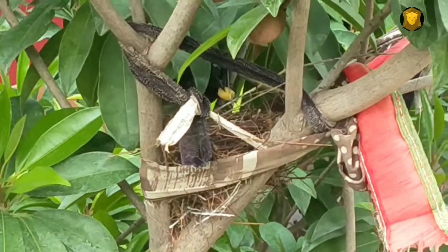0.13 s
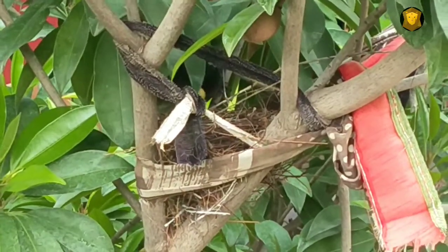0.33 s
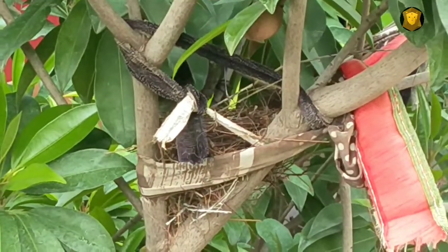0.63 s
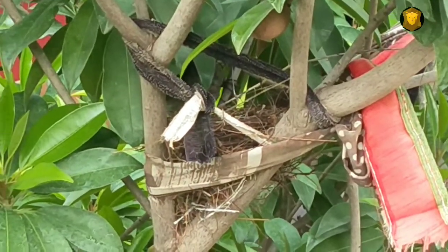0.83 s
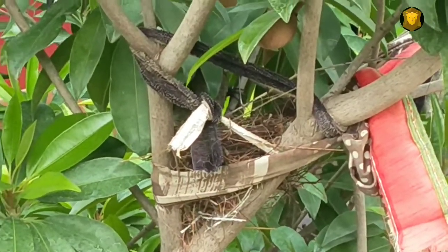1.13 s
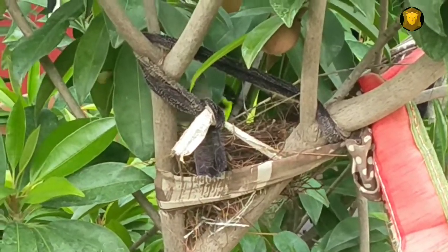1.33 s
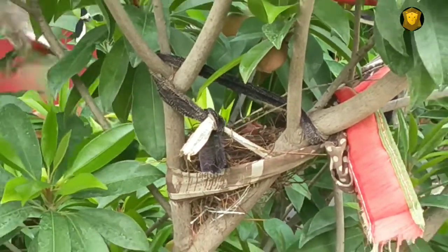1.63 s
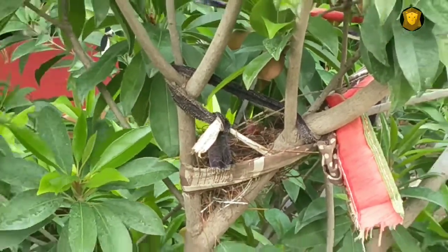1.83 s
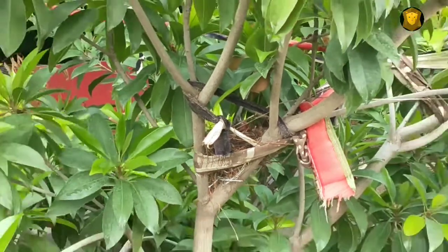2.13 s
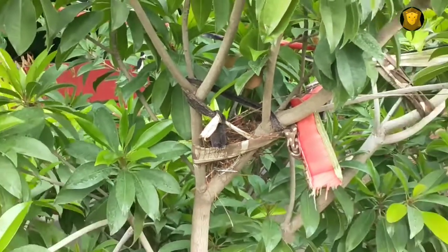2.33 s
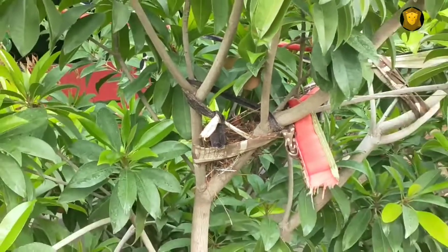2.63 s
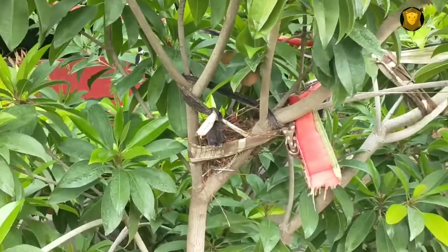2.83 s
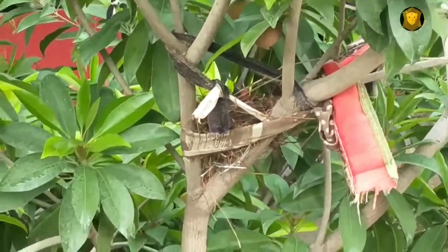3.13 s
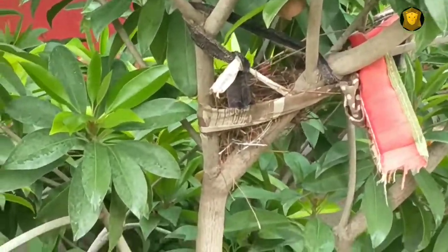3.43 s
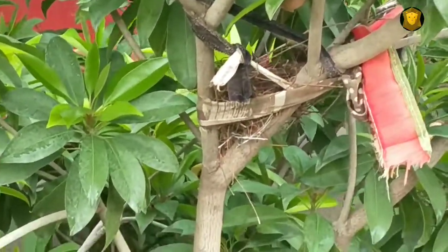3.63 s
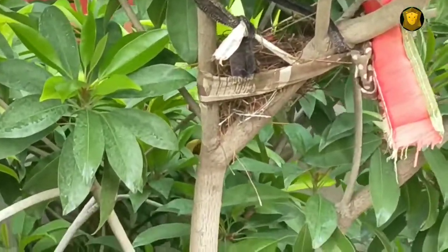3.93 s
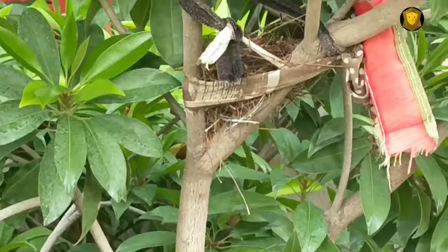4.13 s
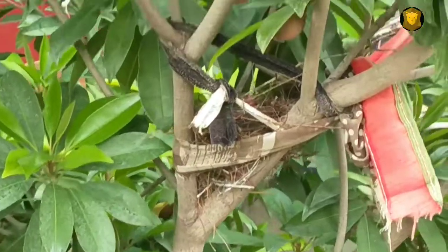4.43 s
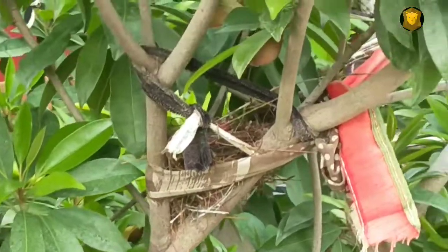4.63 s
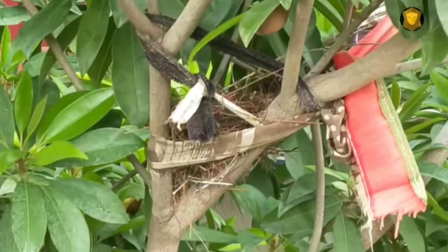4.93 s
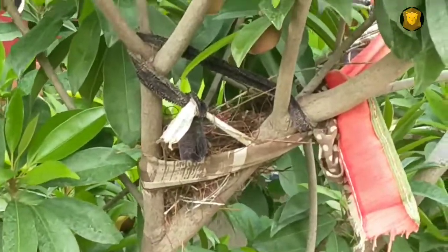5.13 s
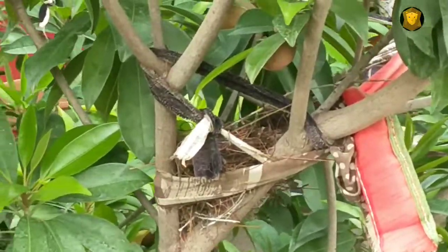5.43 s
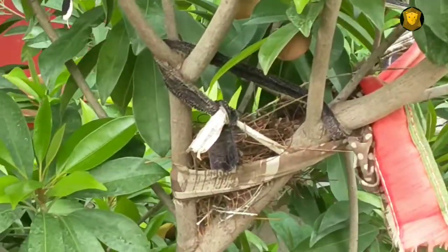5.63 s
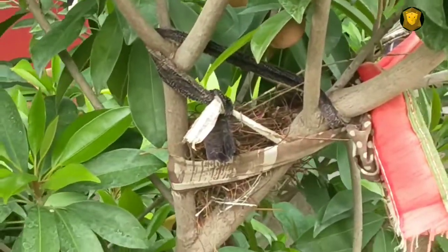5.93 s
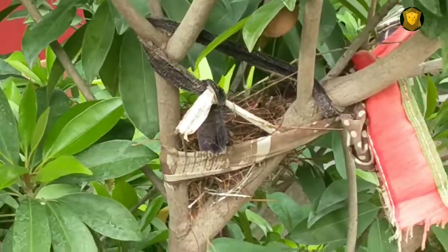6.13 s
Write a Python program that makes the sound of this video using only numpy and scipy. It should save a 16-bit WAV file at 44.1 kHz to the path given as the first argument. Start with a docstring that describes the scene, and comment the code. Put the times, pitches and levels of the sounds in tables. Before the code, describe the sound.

Paired short bird whistles, bright up-flicked chirps, hoarse squawk bursts and two low croaks over rustling leaves and low, uneven wind buffeting.

```python
"""Birds around a garden nest

One bird repeats a level and a falling whistle, another an arch and an up-flick: gliding sines.
A third squawks in bursts of breaking overtones; low croaks are pulses ringing a throat.
Beaks and twigs click as struck resonances, and leaves rustle as patchy noise over faint garden air.
Wind buffets each microphone port on its own. Walls and foliage send back a short echo of noise."""
import sys
import numpy as np
from scipy import signal
from scipy.fft import rfft, irfft, next_fast_len
from scipy.io import wavfile
from scipy.ndimage import uniform_filter1d, map_coordinates

SR = 44100
rng = np.random.default_rng(int(sys.argv[2]) if len(sys.argv) > 2 else 0)


def invert_db(level):
    """Linear amplitude ratio for a level in decibels (20 dB per decade), elementwise."""
    return 10 ** (np.asarray(level, dtype=float) / 20)


def unload_audio(sound):
    """Save the sound as a 16-bit wav file, at the path given as the first command line argument."""
    columns = np.transpose(np.atleast_2d(sound))
    # keep every value between -1 and 1, then stretch to whole-number steps
    steps = np.round(np.clip(columns, -1, 1) * 32767)
    wavfile.write(sys.argv[1], SR, steps.astype(np.int16))


N = 276948
TIME = np.arange(N) / SR


def unit(x):
    """Scales to rms 1 along the last axis."""
    return x / np.sqrt(np.mean(x ** 2, axis=-1, keepdims=True) + 1e-20)


def along(points, hz):
    """Reads (Hz, value) points on a log frequency axis."""
    f, v = np.transpose(points)
    return np.interp(np.log(hz + 1), np.log(f + 1), v)


def curves(rows):
    """Gives one value per sample for each column after the time."""
    s, *cols = np.transpose(rows)
    return [np.interp(TIME, s, c) for c in cols]


def wobble(rate, size=N):
    """A smooth random curve with rate knots a second."""
    knots = rng.standard_normal(int(size * rate / SR) + 4)
    return map_coordinates(knots, [np.arange(size) * rate / SR])


def filtered(x, response):
    """Shapes x by a complex response of frequency."""
    m = next_fast_len(x.shape[-1] + 4096)
    return irfft(rfft(x, m) * response(np.fft.rfftfreq(m, 1 / SR)), m)[..., :x.shape[-1]]


def resonant(modes):
    """Causal response of a few resonances (Hz, width Hz, dB), with alternating signs."""
    def response(f):
        return sum((-1) ** k * invert_db(db) * 1j * f * w / (c * c - f * f + 1j * f * w)
                   for k, (c, w, db) in enumerate(modes))
    return response


def rush(spectrum, patchy_db, size):
    """Unrelated noise per port, rms 1, with patches of random gain about size frames long."""
    z = signal.stft(rng.standard_normal((2, N)), nperseg=512)[2]
    field = uniform_filter1d(rng.standard_normal(z.shape[1:]), size=4, axis=0)
    field = uniform_filter1d(field, size=size, axis=1)
    pair = signal.istft(z * invert_db(patchy_db * field / field.std()), nperseg=512)[1][:, :N]
    return unit(filtered(pair, lambda hz: invert_db(along(spectrum, hz))))


# Echo of walls and foliage. Each row: frequency in Hz, time to fall 60 dB in seconds.
ECHO_DECAY = [(900, 0.32), (2200, 0.45), (5000, 0.48), (9000, 0.011)]


def place(out, s, sound, pan_db, lag, echo_db):
    """Places one row, or one per port, with the left lag samples late and a fresh noise echo."""
    sound = np.atleast_2d(sound)
    hz, t, z = signal.stft(rng.standard_normal((2, SR // 3)), SR, nperseg=256)
    decay = invert_db(-60 * t / along(ECHO_DECAY, hz)[:, None])
    onset = np.minimum(t / 0.0025, 1)
    tail = signal.istft(z * decay * onset, SR, nperseg=256)[1]
    both = invert_db(echo_db) * signal.fftconvolve(sound, tail / np.linalg.norm(tail[0]), axes=1)
    both[0, lag:lag + sound.shape[1]] += invert_db(pan_db / 2) * sound[0]
    both[1, :sound.shape[1]] += invert_db(-pan_db / 2) * sound[-1]
    first = round(s * SR) + SR  # the canvas starts a second early
    out[:, first:first + both.shape[1]] += both


def whistle(out, start, db, hz, pan_db, shape, lag, echo_db, octave_db, lead_scatter,
            drift_db=0, sags=0, drawl=0):
    """One note: an unsteady sine along its shape, with a weak octave; low, slack notes sag and drawl."""
    slack = np.clip((2320 - hz) / 150, 0, 1)
    s, share, shape_db = np.transpose(shape) * [[1 + drawl * slack], [1], [1]]
    t = np.arange(s[0], s[-1], 1 / SR)
    size = len(t)
    pitch_share = np.interp(t, s, share)
    unsteady = np.where(t < 0, lead_scatter, .005)  # the faint lead-in wavers most
    sag = 1 + sags * np.where(t > 0, slack, 0)
    pitch = hz * pitch_share ** sag * (1 + unsteady * wobble(900, size))
    phase = 2 * np.pi * np.cumsum(pitch) / SR
    drift = slack * drift_db * t / s[-1]
    level = invert_db(db + np.interp(t, s, shape_db) + drift + 1.1 * wobble(120, size))
    octave_level = invert_db(octave_db - db) * level ** 2 * (t > 0) * pitch_share ** 12  # fades as the note drops
    octave = octave_level * np.sin(2 * phase) * (1 + .45 * wobble(900, size))
    rough = 1 + .13 * wobble(1500, size)  # a breathy halo
    echo_db = min(echo_db - db, -7.5)
    place(out, start + s[0], level * np.sin(phase) * rough + octave, pan_db, lag, echo_db)


# A level whistle, then a falling one. Each row: start in seconds, gap in seconds,
# first base level in dB, second base level in dB, base pitch in Hz.
WHISTLE_PAIRS = [(-.085, 0.088, -54, -55.5, 2300), (0.218, 0.0859, -49.5, -49.5, 2290),
                 (0.514, 0.085, -47.5, -46, 2330), (0.812, 0.085, -47.5, -49.5, 2333),
                 (1.1115, 0.086, -53.5, -51.5, 2342), (1.4171, 0.082, -52, -51.5, 2310),
                 (1.721, 0.081, -51, -52, 2263), (2.0278, 0.079, -50, -53, 2280),
                 (2.3343, 0.077, -52, -54, 2244), (2.6493, 0.0843, -58, -58.5, 2201),
                 (2.97, 0.074, -60, -59, 2150), (3.294, 0.073, -56.5, -60.5, 2145),
                 (3.6344, 0.076, -57.5, -65, 2114), (3.993, 0.055, -60.5, -67, 2090),
                 (4.342, 0.073, -57, -62.5, 2130), (4.739, 0.0722, -57.5, -60, 2070)]
# The two note shapes. Each row: time from the start in seconds, share of the base pitch, level in dB.
LEVEL_NOTE = [(-.026, .92, -40), (-.016, .98, -16), (-.008, 1.04, -10), (-.003, 1.11, -6),
              (-.001, 1.05, -9), (.003, 1.01, -1), (.02, .995, 0.5), (.042, .96, -4), (.047, .94, -30)]
FALLING_NOTE = [(-.009, 1.14, -40), (-.004, 1.11, -12), (-.001, 1.04, -6), (.003, 1.01, 0.5),
                (.014, .99, -.6), (.03, .9, -5), (.045, .83, -11), (.056, .79, -30)]


def pair_singer(out):
    """A level whistle is followed by a falling one, louder to the left as the bird faces the microphone."""
    echo_db = -63.5  # stays put as the head turns
    for s, gap, level_db, fall_db, hz in WHISTLE_PAIRS:
        pan_db = .5 * (level_db + 57.5)
        whistle(out, s, level_db, hz, pan_db, LEVEL_NOTE, 18, echo_db,
                octave_db=-23.5, lead_scatter=.07, drift_db=-11, sags=1.1)
        # the falling note follows a drop of the level one only in part
        fall_hz = 1.008 * hz + .3 * max(2200 - hz, 0)
        pan_db = .5 * (fall_db + 57.5)
        whistle(out, s + gap, fall_db, fall_hz, pan_db, FALLING_NOTE, 18, echo_db,
                octave_db=-25, lead_scatter=.08, drift_db=6, sags=.1, drawl=.38)


# An arch, then an up-flick. Each row: start in seconds, gap in seconds, arch base level in dB,
# flick base level in dB, left-right balance of the arch in dB.
ARCH_SONGS = [(1.775, 0.12, -70, -52.5, -10), (2.112, 0.13, -61.5, -51, -3), (2.442, 0.13, -67.5, -49, -5),
              (2.778, 0.13, -68, -53.5, -3), (5.255, .13, -70, -53.5, 13), (5.605, 0.13, -72.5, -61, 5),
              (5.951, 0.135, -78, -65, 1)]
# The two note shapes. Each row: time from the start in seconds, share of the base pitch, level in dB.
ARCH_NOTE = [(-.006, .6, -39), (.004, .68, 8), (.02, .94, 6), (0.026, 1.001, 7), (0.036, .94, 9),
             (0.048, .79, 6), (.062, .73, 3.5), (0.068, 0.2, -13.5)]
FLICK_NOTE = [(-.075, .675, -48), (-.03, .69, -34), (-.003, .72, -20), (.006, .78, -7), (.015, .9, -3),
              (.022, .99, -.3), (.027, .995, -1.5), (.034, .95, -9), (.04, .93, -30)]


def arch_singer(out):
    """A note arches up and down, then a higher one flicks up; softer flicks stop lower."""
    loudest = max(row[3] for row in ARCH_SONGS)
    for s, gap, arch_db, flick_db, pan_db in ARCH_SONGS:
        whistle(out, s, arch_db, 3516, pan_db, ARCH_NOTE, 1, echo_db=-72.5,
                octave_db=-70, lead_scatter=.01)
        flick_hz = 5290 + 11.5 * (flick_db - loudest)
        whistle(out, s + gap, flick_db, flick_hz, 8, FLICK_NOTE, 14, echo_db=-62,
                octave_db=-70, lead_scatter=.008)


# Squawks in bursts. Each row: start in seconds, level in dB, left-right balance in dB,
# top of the glide in Hz.
SQUAWK_CALLS = [(1.957, -66, 2, 1037), (2.043, -62.5, 1.5, 1022), (3.644, -62, -1, 1061),
                (3.673, -66.5, -1, 1068), (3.697, -60, 0.5, 1131), (3.762, -57, 2.5, 1011),
                (3.843, -57, 1.5, 1019), (3.95, -55, 0.5, 1135), (4.037, -54, 2.5, 1139),
                (4.129, -55, 0.5, 1144), (5.124, -67.5, -3, 1040), (5.176, -62, -2, 1091),
                (5.247, -59, -3.5, 1014), (5.352, -58.5, -1, 1065)]
# Throat colour. Each row: frequency in Hz, gain in dB.
SQUAWK_THROAT = [(600, -9.5), (850, -5), (1100, -1), (1500, 1.5), (2000, -5), (2500, -1), (3100, -1),
                 (4300, -6), (4900, -1), (5450, 0.5), (5900, -11), (6300, -18.5), (7500, -35.5)]
# Shading of the ports by the microphone's body and branches. Each row: frequency in Hz,
# left-right balance in dB.
SQUAWK_SHADING = [(1000, -2.5), (1900, -6), (2400, 3), (3000, 3.5), (4200, 7.5), (5450, -6.5)]


def squawker(out):
    """Clear overtones glide up, then drop and break: unsteady pitch, half-pitch lines, gated rasp."""
    t = np.arange(0, .043, 1 / SR)
    u = t / t[-1]
    size, margin = len(u), 200  # samples
    effort = np.interp(u, [0, .12, .28, .44, .78, 1], [.02, .45, .95, .94, .55, 0])
    for start, db, pan_db, top_hz in SQUAWK_CALLS:
        hoarse = .12 + .03 * max(-59 - db, 0)  # softer squawks are hoarse from the start
        broken = np.interp(u, [.34, .48], [hoarse, .8])
        from_hz = 980 * (1 - .147 * top_hz / 1140)  # the widest glide starts lowest
        glide = np.interp(u, [0, .44, .54, 1], [from_hz, top_hz, .9 * top_hz, .84 * top_hz])
        phase = 2 * np.pi * np.cumsum(glide * (1 + .143 * broken * wobble(492.5, size))) / SR
        stack = 0
        for k in range(1, 8):
            gate = 1 if k < 4 else 1.37 * broken  # high overtones come with the break
            strength = invert_db(rng.normal(0, 2.7)) * effort ** (.58 * k) * gate
            stack = stack + strength * np.cos(k * phase + k * k)
        stack = stack * (1 - .45 * broken) * (1 + 1.6 * broken * np.cos(phase / 2))
        rasp = 1.05 * broken * effort * rng.standard_normal(size) * (1 + .7 * np.cos(phase / 2))
        pushes = invert_db(3.5 * broken * wobble(170, size))
        source = np.pad(pushes * (stack + rasp), margin)
        voice = unit(filtered(source, lambda hz: invert_db(along(SQUAWK_THROAT, hz))))
        ports = filtered(voice, lambda hz: invert_db(along(SQUAWK_SHADING, hz) * [[.5], [-.5]]))
        place(out, start - margin / SR, invert_db(db) * ports, pan_db, lag=2, echo_db=-9)


# Two croaks, one list each. Each row: time in seconds, pulses a second, level in dB.
CROAK_CALLS = [
    [(0, 87, -66), (.1, 87, -65), (.3, 86, -63), (.36, 78, -63), (.43, 68, -63.5), (.47, 61, -63),
     (.5, 57, -68)],
    [(5.968, 84, -75), (6.04, 80, -73), (6.12, 71, -67.5), (6.18, 62, -66), (6.24, 50, -69),
     (6.28, 48, -73)],
]
# Throat resonances. Each row: frequency in Hz, width in Hz, gain in dB for one pass.
CROAK_THROAT = [(757, 410, 0.5), (1320, 260, 4.5), (1727, 105, 6), (2030, 230, 1.5), (2470, 79, 2.5),
                (3300, 400, -3.5)]


def croaker(out):
    """Slow uneven pulses ring a throat, with a puff of breath noise in each."""
    for rows, puff in zip(CROAK_CALLS, (.03, .05)):
        s, rate, db = np.transpose(rows)
        t = np.arange(s[0], s[-1], 1 / SR)
        cycles = np.cumsum(np.interp(t, s, rate) * (1 + .015 * wobble(60, len(t)))) / SR
        pulses = np.diff(np.floor(cycles), prepend=0) * invert_db(1.5 * rng.standard_normal(len(t)))
        puffs = puff * np.exp(-(cycles % 1) / .2) * rng.standard_normal(len(t))
        # squared response: the throat twice over, with deep valleys
        voice = unit(filtered(pulses + puffs, lambda hz: resonant(CROAK_THROAT)(hz) ** 2))
        place(out, s[0], invert_db(np.interp(t, s, db)) * voice, pan_db=1.5, lag=19, echo_db=-13)


# Beak snaps, then twig cracks. Each row: start in seconds, peak level in dB, left-right balance in dB.
BEAK_SNAPS = [(5.4066, -60, 0.5), (5.4437, -48, -5), (5.476, -56, -6), (5.5091, -41, -8)]
TWIG_CRACKS = [(1.247, -64, -13), (4.3044, -60, -10), (5.5526, -59.5, -3), (5.5977, -50, -3)]
# Their resonances. Each row: frequency in Hz, width in Hz, gain in dB.
BEAK_RING = [(1776, 237, -14.5), (2710, 166, -7)]
TWIG_RING = [(5230, 750, -8), (6500, 820, -30), (13800, 1700, -17.5)]


def clicks(out):
    """A beak snaps in one dry blow; a twig cracks and scrapes more: noise bursts ring resonances."""
    t = np.arange(0, .04, 1 / SR)
    for events, modes, scrape in (BEAK_SNAPS, BEAK_RING, .02), (TWIG_CRACKS, TWIG_RING, .25):
        for s, db, pan_db in events:
            envelope = np.exp(-t / .00023) + scrape * np.exp(-t / .019)
            blow = rng.standard_normal(len(t)) * envelope
            # distance dulls the top
            ring = filtered(blow, lambda hz: resonant(modes)(hz) / (1 + 1j * hz / 6000) ** 2)
            place(out, s, invert_db(db) * ring / abs(ring).max(), pan_db, lag=0, echo_db=-7)


# Faint whistles farther off. Each row: start in seconds, length in seconds, start pitch in Hz,
# end pitch in Hz, level in dB.
FAR_WHISTLES = [(0.168, 0.06, 4900, 5250, -73), (1.135, .045, 5120, 5100, -78),
                (1.328, 0.09, 3960, 4410, -77.5), (1.4, 0.04, 5500, 4990, -74),
                (1.702, 0.024, 5410, 5250, -74.5), (3.441, 0.028, 2830, 2880, -71),
                (4.066, 0.135, 2310, 2325, -58.5), (4.075, 0.05, 5300, 6000, -67),
                (4.23, 0.046, 2440, 2310, -69), (4.384, 0.09, 2340, 2455, -64),
                (4.575, .045, 2530, 2440, -75), (5.685, 0.085, 1900, 1760, -73),
                (5.665, 0.1, 2490, 2190, -69), (5.862, .045, 3240, 3335, -81),
                (6.147, 0.025, 2740, 2820, -69)]
# Left-right balance of the far whistles by pitch, all to the left. Each row: pitch in Hz, balance in dB.
FAR_BALANCE = [(2300, 14), (4000, 17), (5600, 9)]


def far_whistlers(out):
    """Short faint sines glide between two pitches, lingering at the highest."""
    for start, length, from_hz, to_hz, db in FAR_WHISTLES:
        u = np.arange(0, 1, 1 / (length * SR))
        arched = u ** 2 if to_hz < from_hz else 1 - (1 - u) ** 3
        pitch = from_hz + (to_hz - from_hz) * arched + .012 * from_hz * wobble(200, len(u))
        phase = 2 * np.pi * np.cumsum(pitch) / SR
        level = invert_db(db + 2.2 * wobble(90, len(u))) * np.sin(np.pi * u) ** .6
        place(out, start, level * np.sin(phase), along(FAR_BALANCE, from_hz), lag=8, echo_db=-7)


# Slow swell and fall of the rustle in the breeze. Each row: time in seconds, level in dB.
BREEZE_LEVEL = [(0, -94), (1.1, -98.5), (1.35, -92), (1.7, -76), (3.1, -83.5), (3.45, -73.5), (4.3, -73),
                (5.02, -83), (5.5, -77), (6.28, -80.5)]
# Stirs of the leaves. Each row: start in seconds, length in seconds, rustle level in dB,
# fine hiss level in dB.
LEAF_STIRS = [(1.452, 0.061, -69.5, -91), (1.623, 0.036, -75.5, -83), (3.465, 0.45, -86, -92),
              (3.59, 0.037, -69.5, -73.5), (4.074, 0.08, -67.5, -100), (4.293, 0.097, -89, -85.5),
              (4.48, 0.098, -72, -83.5), (4.609, 0.14, -69, -83.5), (5.245, 0.148, -71, -80),
              (5.606, 0.0556, -74, -84), (5.752, 0.043, -70, -99), (5.826, 0.02, -80, -89),
              (6.041, 0.14, -66.5, -76)]
# Colours of the rustle and of the hiss. Each row: frequency in Hz, relative gain in dB.
RUSTLE_COLOUR = [(1880, -29.5), (3200, -12.5), (3800, -12), (5230, 0), (8480, -24), (9500, -28),
                 (12400, -52), (20900, -120)]
HISS_COLOUR = [(5000, -49), (7500, -16), (10500, -10.5), (12800, -8.5), (14300, -4), (15400, -12)]


def leaves():
    """Leaves rub in the breeze and stir now and then: crackly rustle noise and a finer hiss."""
    rustle_gain, hiss_gain = invert_db(curves(BREEZE_LEVEL)[0]), invert_db(-102)
    for s, length, rustle_db, hiss_db in LEAF_STIRS:
        rise, fall = (s - TIME) / .037, (TIME - s - length) / .17  # seconds for 20 dB
        stir = invert_db(-20 * np.maximum(0, np.maximum(rise, fall)))
        rustle_gain = np.hypot(rustle_gain, invert_db(rustle_db) * stir)
        hiss_gain = np.hypot(hiss_gain, invert_db(hiss_db) * stir)
    crackle = unit(invert_db(2.7 * wobble(300) + 1.6 * wobble(30)))
    rustle = rustle_gain * crackle * rush(RUSTLE_COLOUR, patchy_db=3.5, size=14)
    hiss = hiss_gain * crackle * rush(HISS_COLOUR, patchy_db=1, size=8)
    return rustle + hiss


# Eddies on a port. Each row: time in seconds, nominal peak in dB, pitch of the push in Hz,
# port (0 left, 1 right).
EDDIES = [(0.012, -31, 125, 1), (0.066, -24.5, 100, 0), (0.091, -31, 180.4, 0), (0.238, -30, 116, 0),
          (0.477, -29, 148, 0), (0.487, -25.5, 126, 1), (0.566, -29, 160, 0), (0.586, -29.5, 109, 0),
          (0.644, -27.5, 119, 1), (0.862, -30, 113, 0), (1.184, -27, 129, 0), (1.196, -32.5, 92, 0),
          (1.208, -33, 117.4, 0), (1.66, -28, 93, 1), (1.806, -32.5, 117, 1), (2.158, -25.5, 110, 1),
          (2.177, -32.5, 162, 0), (2.51, -31, 128.9, 1), (3.233, -30, 122, 1), (3.347, -31, 145, 1),
          (3.525, -32, 180, 1), (3.745, -27, 140.8, 1), (3.79, -31.5, 132, 1), (3.932, -19, 135, 1),
          (3.939, -39, 134, 1), (3.961, -16.5, 202, 1), (3.97, -17, 135.4, 1), (4.036, -21.5, 121, 1),
          (4.099, -31.5, 135.6, 1), (4.418, -30, 149, 0), (4.452, -29.5, 88.5, 0), (4.827, -30, 150, 0),
          (0.163, -31.5, 122, 0), (0.742, -34, 84, 0), (1.049, -37, 117, 1), (1.07, -35.5, 100, 0),
          (1.26, -35.5, 130, 1), (1.436, -39.5, 111, 1), (1.591, -35, 105, 1), (2.229, -37.5, 117, 0),
          (3.642, -33.5, 123, 1), (3.698, -31, 110, 1), (4.263, -36, 121.7, 0), (4.538, -61, 119, 0),
          (4.787, -32, 98, 0), (4.87, -35, 79, 1), (5.128, -36, 124, 1), (5.141, -33, 120, 0),
          (5.236, -30.5, 141, 0), (5.386, -38, 94, 0), (5.717, -35, 87.3, 0), (5.78, -38.5, 120, 1),
          (5.949, -34, 120, 0), (6.03, -37, 119, 0), (6.188, -36.5, 104, 1), (6.255, -35, 103, 1)]


def eddies():
    """A single eddy gives its port one quick push and rebound, with a small sharp front."""
    out = np.zeros((2, N + 2 * SR))
    t = np.arange(-SR // 50, SR // 20) / SR
    for s, peak_db, hz, port in EDDIES:
        x = (np.pi * hz * t) ** 2
        push = (1 - 2 * x) * np.exp(-x)
        x = (2.2 * np.pi * hz * t) ** 2
        edge = .047 * (1 - 2 * x) * np.exp(-x)
        first = round(s * SR) + SR - SR // 50
        out[round(port), first:][:len(t)] += invert_db(peak_db) * (.83 * push + edge)
    return out[:, SR:SR + N]


# Wind strength. Each row: time in seconds, strength in dB, left-right balance in dB.
WIND_STRENGTH = [(0.0, -47.5, -3.5), (0.1, -47.5, 14.5), (0.61, -51, 0.5), (1.22, -47.5, 4),
                 (1.7, -55.5, -4), (2.26, -49, 10), (2.33, -53.5, -9), (3.01, -59, -3.5),
                 (3.32, -51.5, -18.5), (3.78, -56, -13), (3.86, -51.5, -8), (3.93, -54.5, -17.5),
                 (4.32, -53.5, 16.5), (4.56, -50.5, 6.5), (5.74, -56.5, 5.5), (5.86, -54, -13.5),
                 (5.93, -51, 6), (6.28, -63, -7)]
# Colour of the buffeting. Each row: frequency in Hz, relative gain in dB.
BUFFET_COLOUR = [(12, -29), (20, -17), (61, 2.5), (112, 3), (219, -11.5), (410, -32), (468, -39.5),
                 (700, -30.5), (910, -69.5), (1540, -120)]


def buffeting():
    """Turbulence shakes each port in its own lumps, brighter when stronger and harder around eddies."""
    strength_db, pan_db = curves(WIND_STRENGTH)
    power = invert_db([strength_db + pan_db / 2, strength_db - pan_db / 2]) ** 2
    for s, peak_db, hz, port in EDDIES:
        swell_db = -42 + .55 * (peak_db + 28)
        power[round(port)] += invert_db(swell_db) ** 2 * np.exp(-((TIME - s) / .026) ** 2)
    gust = np.sqrt(power)
    lumps = invert_db(2.6 * np.array([wobble(30), wobble(30)]))
    shake = gust * unit(lumps * rush(BUFFET_COLOUR, patchy_db=1.5, size=8))
    noise = filtered(rng.standard_normal((2, N)), resonant([(260, 260, 1.7)]))
    flutter = 6 * gust ** 1.58 * lumps * noise
    return shake + filtered(flutter, lambda hz: 1 / (1 + (hz / 450) ** 4))


# Distant murmur of air and traffic, then its thin treble. Each row: time in seconds, level in dB.
MURMUR_LEVEL = [(0.0, -62), (0.68, -68), (1.3, -68.5), (2.5, -69.5), (4.7, -70), (5.0, -70), (5.3, -68.5),
                (6.28, -66)]
TREBLE_LEVEL = [(0, -92), (.22, -78.5), (.45, -82.5), (1.1, -83.5), (1.6, -81), (4.7, -85), (5.0, -90),
                (5.3, -84.5)]
# Their colours. Each row: frequency in Hz, relative gain in dB.
MURMUR_COLOUR = [(180, -30), (300, 2.5), (400, -1), (455, -4.5), (560, -7.5), (731, -10.5), (900, -19),
                 (1220, -20), (1700, -20), (2070, -18.5), (2360, -16.5), (2700, -17), (3300, -59)]
TREBLE_COLOUR = [(2200, -29.5), (2800, -4), (3570, -3.5), (4050, -13.5), (4600, -7), (5390, -9.5),
                 (6500, -19.5), (15500, -23.5)]


def garden_air():
    """Distant air and traffic as coloured noise, a thin treble, and a faint far drone of narrow noise."""
    murmur = invert_db(curves(MURMUR_LEVEL)[0]) * rush(MURMUR_COLOUR, patchy_db=4, size=16)
    treble = invert_db(curves(TREBLE_LEVEL)[0]) * rush(TREBLE_COLOUR, patchy_db=7.5, size=24)
    drone = invert_db(-87) * unit(filtered(rng.standard_normal(N), resonant([(671.8, 13, 0)])))
    return murmur + treble + drone


def scene():
    """Birds and clicks with their echoes, over leaves, wind and garden air."""
    out = np.zeros((2, N + 2 * SR))
    for source in pair_singer, arch_singer, squawker, croaker, clicks, far_whistlers:
        source(out)
    return out[:, SR:SR + N] + leaves() + eddies() + buffeting() + garden_air()


def low_pass(x):
    """Removes everything above the highest recorded frequency."""
    return signal.sosfilt(signal.butter(12, 15640, fs=SR, output="sos"), x)


def record(dry):
    """Delivers the finished stereo mix."""
    return low_pass(dry)


dry = scene()
out = record(dry)
unload_audio(out)
```